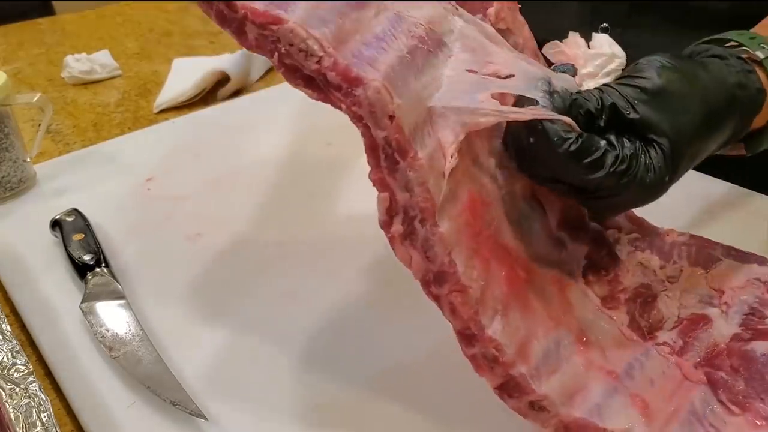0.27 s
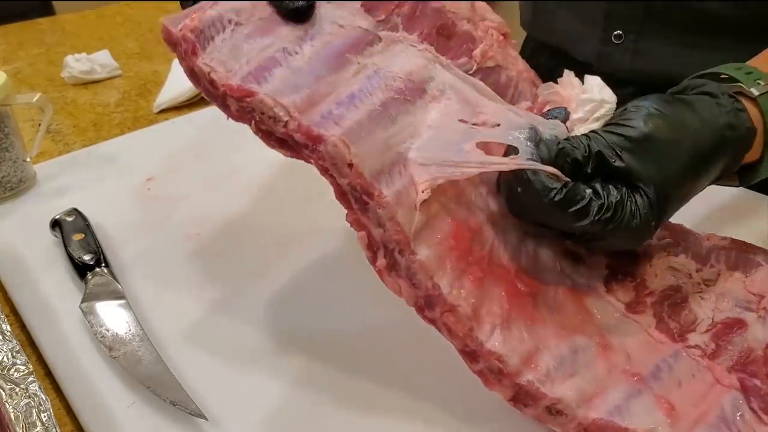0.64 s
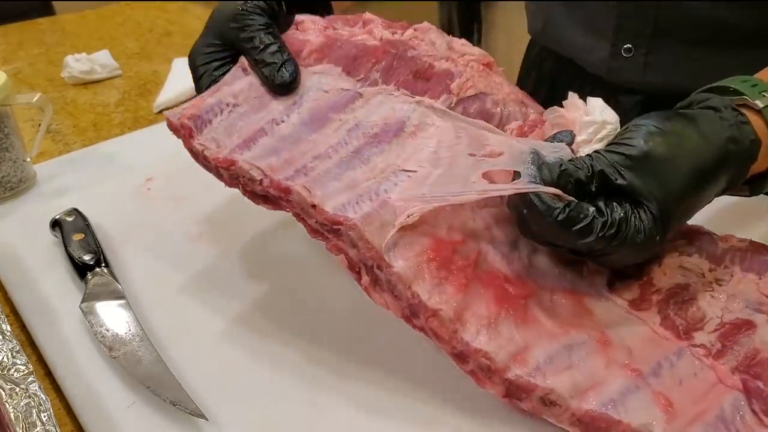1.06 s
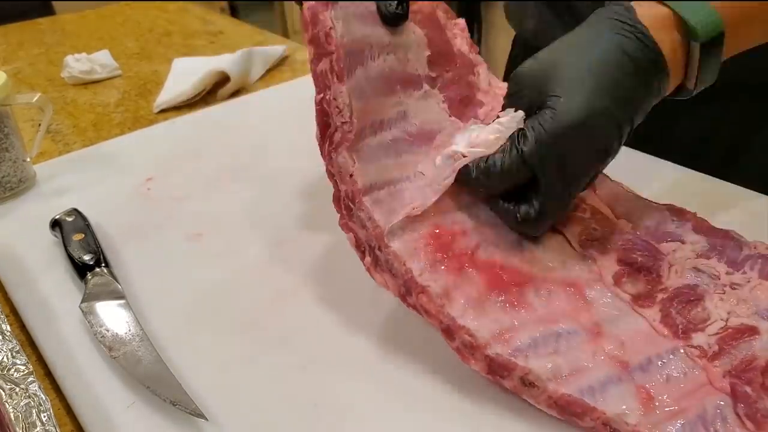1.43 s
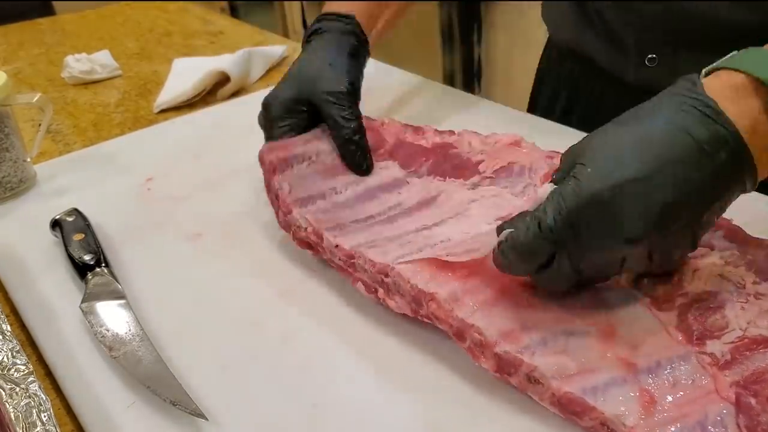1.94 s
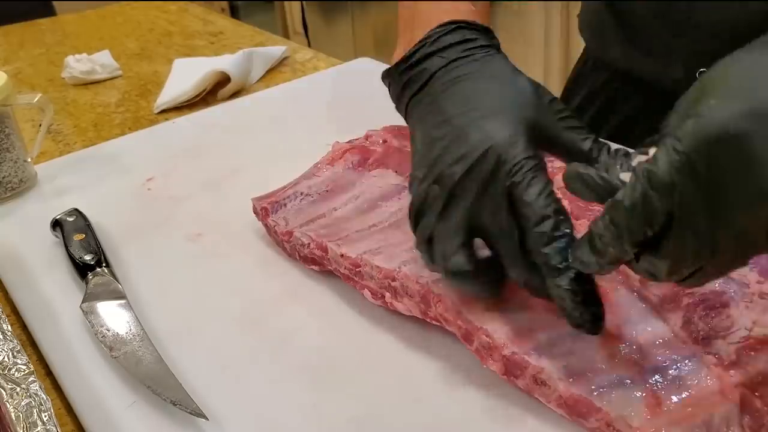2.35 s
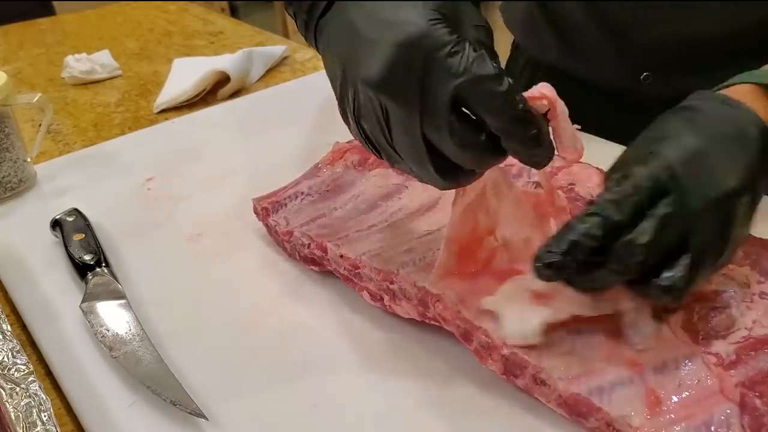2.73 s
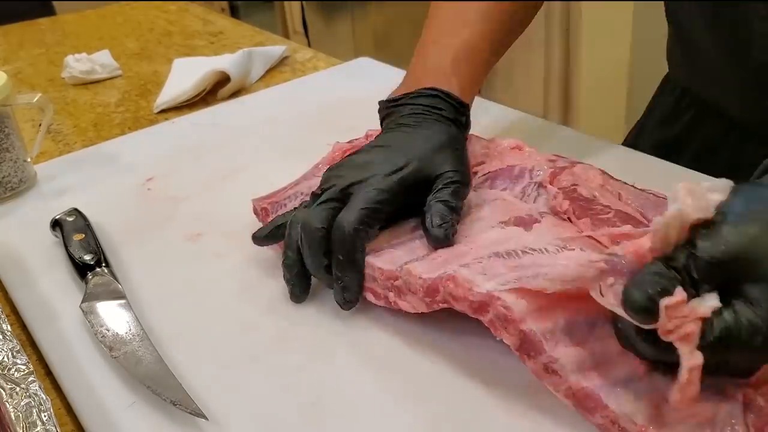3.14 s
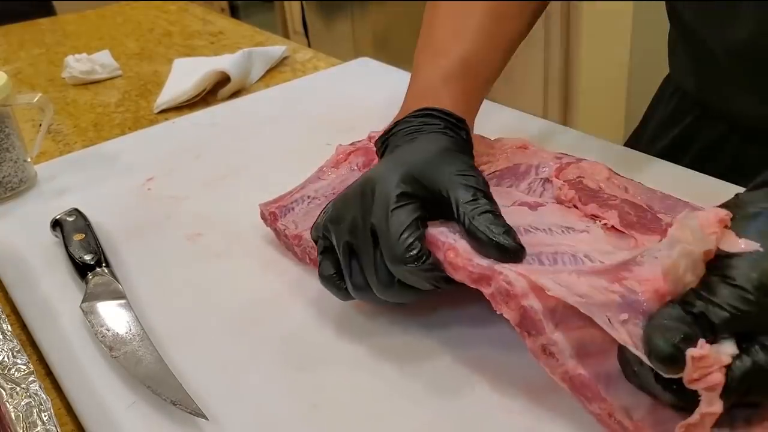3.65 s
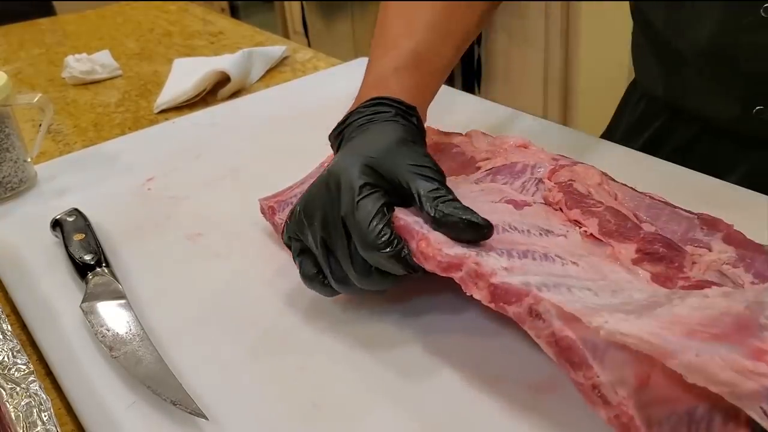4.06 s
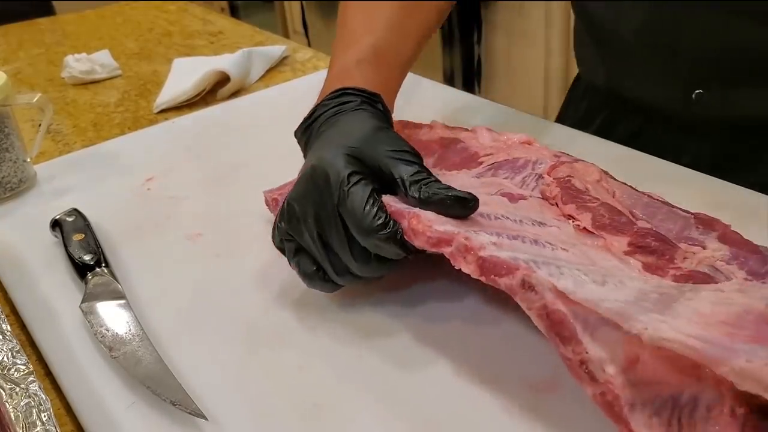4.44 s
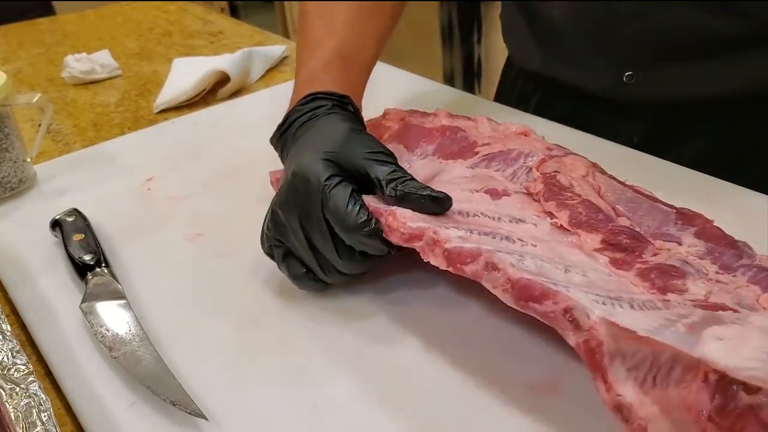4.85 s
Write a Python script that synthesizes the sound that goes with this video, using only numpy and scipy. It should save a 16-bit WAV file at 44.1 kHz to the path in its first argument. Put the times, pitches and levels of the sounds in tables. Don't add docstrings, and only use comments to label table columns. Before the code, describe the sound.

Close wet-sticky tearing and snapping from a rack of meat in a kitchen, rubbery squeaks, brief cut-off pulls, and a steady low hum beneath.

```python
import sys
import numpy as np
from scipy import signal
from scipy.fft import rfft, irfft, next_fast_len
from scipy.io import wavfile
from scipy.ndimage import uniform_filter1d

SR = 44100
rng = np.random.default_rng(int(sys.argv[2]) if len(sys.argv) > 2 else 0)


def store_wav(level_fs):
    pcm = np.round(np.clip(np.atleast_2d(level_fs), -1, 1) * 32767)
    wavfile.write(sys.argv[1], SR, pcm.T.astype(np.int16))


def how_loud(loudness_db):
    steps = np.asarray(loudness_db, float) / 20
    return 10 ** steps


N = 224557
LEFT_RIGHT = np.array([[1], [-1]])


def rms_one(x):
    return x / np.sqrt(np.mean(x ** 2) + 1e-20)


def at_hz(points, hz):
    table_hz, values = np.transpose(points)
    return np.interp(np.log(hz), np.log(table_hz), values)


def at_time(points, t):
    return np.interp(t, *np.transpose(points))


def drift(rate_hz):
    r = np.exp(-2 * np.pi * rate_hz / SR)
    slow = signal.lfilter([1], [1, -2 * r, r * r], rng.standard_normal(N + SR))
    return rms_one(slow[SR:])


def resonance(x, hz, width_hz):
    r = np.exp(-np.pi * width_hz / SR)
    zeros = np.array([1, 0, -1]) * (1 - r * r) / 2
    poles = [1, -2 * r * np.cos(2 * np.pi * hz / SR), r * r]
    return signal.lfilter(zeros, poles, x + 1e-18)


# (frequency [Hz], correlation [-1 to 1])
PORT_LIKENESS = [(50, .999), (125, .96), (250, .93), (500, .9), (1000, .78), (2000, .55), (8000, .4),
                 (14000, .3)]
# (frequency [Hz], left over right [dB])
PORT_LEAN = [(60, 0.0), (180, 0.0), (550, 0.6), (1650, 0.8), (4970, 2.4), (9000, -0.5), (15000, 0.5)]


def stereo(mid, side, hz):
    alike = np.clip(at_hz(PORT_LIKENESS, hz), -1, 1)
    lean = how_loud(at_hz(PORT_LEAN, hz) / 2 * LEFT_RIGHT)
    common = np.sqrt((1 + alike) / 2) * mid
    unlike = np.sqrt((1 - alike) / 2) * side * LEFT_RIGHT
    return lean * (common + unlike)


def room_noise(spectrum):
    bins_hz = np.fft.rfftfreq(N, 1 / SR) + 1
    mid, side = rfft(rng.standard_normal((2, N))) * how_loud(at_hz(spectrum, bins_hz))
    return rms_one(irfft(stereo(mid, side, bins_hz), N))


# (time [s], share of crackle [0-1])
CRACKLE_SHARE = [
    (0, 0.3),
    (.55, 0.67),
    (.7, 0.45),
    (1.2, 0.4),
    (1.4, 0.3),
    (5.1, 0),
]


def fibres(per_s, size_db):
    born = rng.random(N) < per_s * how_loud(4.0 * drift(25)) / SR
    sizes = born * how_loud(size_db * np.minimum(rng.exponential(1, N), 2.5))
    breaks = rms_one(signal.lfilter([1], [1, -.85], sizes))
    share = np.clip(at_time(CRACKLE_SHARE, np.arange(N) / SR), 0, 1)
    return np.sqrt(1 - share + share * breaks ** 2) * how_loud(1.23 * drift(44))


# (peak time [s], peak level [dB], rise [s], fall [s], weight on the board [dB])
SWELLING_PULLS = [(0.064, -49, .12, 0.25, -24), (0.205, -42, .3, .085, -19.5), (0.3, -58, .05, 0.22, -11.5),
                  (0.5, -57, .12, 0.14, -20), (0.608, -48.5, 0.27, 0.39, -31),
                  (0.706, -41.5, 0.22, 0.18, -18.5), (0.99, -62, 0.19, 0.38, -21),
                  (1.146, -59, 0.52, .08, -20), (1.49, -70.5, 0.14, 0.22, -10),
                  (1.866, -45, 0.077, 0.086, -24), (2.388, -56.5, 0.063, 0.043, -13.5),
                  (2.61, -71, 0.07, 0.11, -8), (2.804, -64.5, 0.062, 0.34, -10.5),
                  (3.275, -61.5, 0.024, 0.065, -13), (3.565, -58.5, 0.062, 0.17, -15),
                  (3.765, -34, .06, .1, -5.5), (3.96, -62.5, .3, 0.33, -10.5),
                  (4.052, -59.5, 0.089, 0.15, -5.5), (4.225, -71, .015, .08, -12),
                  (4.258, -67, 0.08, .1, -6.5), (4.37, -71, 0.2, 0.11, -17),
                  (4.485, -34, 0.064, 0.11, -6.5), (4.6, -60, .1, .2, -14), (4.95, -35, .075, .14, -9)]
# (start time [s], end time [s], start level [dB], end level [dB], weight on the board [dB])
CUT_PULLS = [(1.19, 1.317, -76, -79, -10), (1.31, 1.398, -70, -88, -8), (1.582, 1.737, -48.5, -54.5, -20),
             (1.742, 1.8, -66, -79, -9), (1.9, 1.99, -62, -74, -25), (2.04, 2.146, -56, -61, -10.5),
             (2.146, 2.197, -74, -66.5, -11), (2.199, 2.32, -51, -52, -16), (3.034, 3.102, -63, -54, -10.5),
             (3.105, 3.193, -49, -52, -1.5), (3.198, 3.232, -63, -81, -8), (3.338, 3.388, -71.5, -55, -17),
             (3.506, 3.713, -62, -64, -7), (4.845, 4.91, -60, -70, -9)]
# (time [s], level [dB])
SKIN_DRYNESS = [(0, 2.5), (1.1, 6), (1.55, 1), (1.95, 3.5), (2.08, 8), (2.19, 0), (2.75, 1), (3.27, 4),
                (3.36, -3), (3.47, -21), (3.51, 9.5), (3.6, 8.5), (3.8, -1), (4.3, 6.5), (4.5, -0.5),
                (4.7, -12), (4.85, 3.5), (5.09, -4.5)]
# (time [s], level [dB])
SKIN_SLACK = [(0, -2), (0.2, 2), (0.35, -5), (0.58, -5), (0.72, 0.5), (1.15, 1.5), (1.6, 1.5), (1.88, 1.5),
              (1.95, -14), (2.05, 0.5), (3.1, 1.5), (3.5, -5), (3.66, 2.5), (3.78, -1.5), (4.05, 1.5),
              (4.3, -4), (4.5, -1), (5.09, -1.5)]
SWELL_DB, SPLICE_S = 20, .003
CREST = .04
THUD_STEEP, BODY_STEEP, FIZZ_STEEP = 1.057, 1.26, 0.99


def effort():
    t = np.arange(0, N, 44) / SR
    pulls = []
    for peak_s, peak_db, rise_s, fall_s, weight_db in SWELLING_PULLS:
        away = np.maximum((peak_s - t) / rise_s, (t - peak_s) / fall_s)
        shape_db = -SWELL_DB * (np.hypot(away, CREST) - CREST)
        pulls.append((peak_db, shape_db, weight_db))
    for start, end, start_db, end_db, weight_db in CUT_PULLS:
        outside_s = np.maximum(np.maximum(start - t, t - end), 0)
        level_db = np.interp(t, [start, end], [start_db, end_db])
        pulls.append((level_db, -SWELL_DB * outside_s / SPLICE_S, weight_db))
    dry_db, slack_db = at_time(SKIN_DRYNESS, t), at_time(SKIN_SLACK, t)
    power = 0
    for top_db, shape_db, weight_db in pulls:
        thud_db = weight_db + .35 * slack_db + THUD_STEEP * shape_db
        body_db = -1.5 + 0.29 * weight_db + slack_db + BODY_STEEP * shape_db
        fizz_db = dry_db + FIZZ_STEEP * shape_db
        power = power + how_loud(top_db + np.array([thud_db, body_db, shape_db, fizz_db])) ** 2
    return [np.interp(np.arange(N) / SR, t, np.sqrt(p)) for p in power]


REGION_BORDERS = [1450, 2800, 6500]
# (frequency [Hz], density [dB per Hz])
TEAR_COLOUR = [(120, -17), (200, -5.5), (310, -12.5), (516, -6.5), (716, -10.5), (799, -1.5), (977, -9.5),
               (1360, -3), (1630, -7), (1920, -3), (7800, -9.5), (15600, -5.5)]
# (frequency [Hz], width [Hz], level [dB])
BOARD_MODES = [
    (522, 35, -3),
    (1380, 200, -14),
]
# (time [s], left port late by [samples])
HAND_LAG = [
    (0, 0.5),
    (1.3, 2),
    (1.4, 0.5),
    (5.1, 5),
]


def tearing():
    force = fibres(per_s=900.0, size_db=3.5) * rng.standard_normal((2, 2, N))
    regions = np.zeros((4, 2, N))
    edges_hz = 166 * 2 ** np.arange(0, 6.9, 1 / 3)
    wander = how_loud(1.6 * drift(14))
    for k, (low, high) in enumerate(zip(edges_hz, edges_hz[1:])):
        hz = np.sqrt(low * high)
        band = signal.butter(2, [low, high], "band", fs=SR, output="sos")
        mid, side = signal.sosfilt(band, force[k % 2])
        colour = how_loud(at_hz(TEAR_COLOUR, hz)) * np.roll(wander, 9973 * k)
        regions[np.searchsorted(REGION_BORDERS, hz)] += colour * stereo(mid, side, hz)
    for hz, width_hz, level_db in BOARD_MODES:
        ringing = resonance(force[0], hz, width_hz)
        regions[np.searchsorted(REGION_BORDERS, hz)] += how_loud(level_db + 0.5) * stereo(*ringing, hz)
    left, right = sum(gain * rms_one(region) for gain, region in zip(effort(), regions))
    sample = np.arange(N)
    lag = at_time(HAND_LAG, sample / SR).round()
    return np.array([np.interp(sample - lag, sample, left), right])


# (time [s], length [s], frequency [Hz], width [Hz], level [dB])
SKIN_SQUEAKS = [(0.1, .46, 601, 25, -76), (0.0, .3, 244.5, 12, -64), (0.549, 0.12, 2950, 400, -55),
                (0.78, .43, 1980, 790, -63), (1.01, .025, 4530, 200, -64), (2.042, .1, 5200, 1500, -55.5),
                (2.042, 0.09, 1920, 520, -62.5), (3.085, .11, 1950, 300, -56),
                (3.267, 0.077, 1450, 45, -70.5), (3.59, .12, 1760, 500, -61), (3.66, .18, 1690, 700, -48.5),
                (3.731, .12, 525, 26, -52.5), (4.037, 0.088, 1610, 700, -67),
                (4.221, 0.064, 1300, 700, -74), (4.448, 0.11, 529, 25, -52.5),
                (4.451, 0.071, 1350, 240, -46.5), (4.84, .05, 3130, 600, -58),
                (4.92, 0.063, 832, 160, -50.5), (4.89, .14, 3300, 1500, -47), (4.43, .12, 3100, 900, -50),
                (0.617, .15, 9000, 2000, -50), (0.618, 0.17, 2090, 810, -52),
                (2.79, 0.098, 4200, 2500, -66)]


def squeaks():
    out, t = np.zeros((2, N)), np.arange(N) / SR
    stutter = how_loud(2.5 * drift(80))
    white = stutter * rng.standard_normal((2, N))
    for s, length, hz, width_hz, level_db in SKIN_SQUEAKS:
        span = slice(max(round(s * SR) - 4000, 0), round((s + length) * SR))
        to_edge_s = np.minimum(t[span] - s, s + length - t[span])
        gate = np.clip(to_edge_s / (0.18 * length), 0, 1)
        ringing = resonance(white[:, span], hz, width_hz)
        ringing = rms_one(resonance(ringing, hz, width_hz))
        out[:, span] += how_loud(level_db) * gate * stereo(*ringing, hz)
    return out


# (start time [s], frequency [Hz], skipped at the start [turns])
HUM_STRETCHES = [
    (0, 53.1, 0),
    (1.317, 51.75, .5),
    (2.32, 51.75, -.25),
    (3.568, 53.1, -.5),
]
# (frequency [Hz], density [dB per Hz])
RUMBLE_COLOUR = [(20, -27), (31, -6.5), (41, -17), (70, -5), (85, -1), (110, -10.5), (135, -13.5),
                 (157, -8.5), (180, -15), (197, -13), (250, -22.5), (400, -34.5), (1000, -50.5),
                 (16000, -54.5)]
# (frequency [Hz], density [dB per Hz])
HISS_COLOUR = [(300, -8), (1000, -2), (2000, -20), (4200, -2), (6500, -0.5), (7500, -7), (9700, 5.5),
               (16000, -6)]


def compressor():
    start, hz, skipped = np.transpose(HUM_STRETCHES)
    turns = hz[np.searchsorted(start[1:], np.arange(N) / SR)] / SR
    turns[(start * SR).astype(int)] += skipped
    phase = 2 * np.pi * np.cumsum(uniform_filter1d(turns, size=480))
    hum = how_loud(-47) * np.sqrt(2) * np.sin(phase)
    rumble = how_loud(-52.0) * room_noise(RUMBLE_COLOUR)
    hiss = how_loud(-74 + 0.8 * drift(6)) * room_noise(HISS_COLOUR)
    return hum + rumble + hiss


# (time [s], peak level [dB], ring [Hz], top end over ring [dB])
LOUD_SNAPS = [(0.0198, -31, 6550, 3), (0.062, -29, 5170, -2), (0.0685, -21, 4740, 4),
              (0.094, -23, 6680, 4), (0.1187, -27, 4650, -2), (0.1693, -25, 5040, -1),
              (0.215, -25, 4440, -4), (0.2995, -26, 4870, 0), (0.3529, -25, 4910, -5),
              (0.401, -37, 4130, -2), (0.438, -35, 5300, 6), (0.4707, -29, 6760, -3),
              (0.5493, -23, 4390, 3), (0.5649, -31, 3010, -1), (0.5822, -30, 2540, 3),
              (0.6944, -24, 7060, -1), (0.7621, -28, 3960, -4), (0.8035, -31, 4010, 4),
              (1.0375, -25, 2760, 9), (1.3173, -43, 3140, -6), (1.8539, -26, 5470, 3),
              (2.2025, -33, 4780, -10), (2.3142, -37, 4820, -12), (2.3751, -37, 4130, 6),
              (3.1021, -33, 6850, 6), (3.3872, -45, 4740, -15), (3.6347, -41, 3570, 1),
              (3.9744, -38, 6590, -1), (4.0407, -38, 2020, 12), (4.8479, -38, 3270, -6)]
# (time [s], peak level
# [dB])
FAINT_SNAPS = [(0.2822, -45), (0.331, -36), (0.36, -38), (0.3813, -37), (0.3856, -42), (0.452, -35.5),
               (0.5223, -36), (0.8237, -40), (0.8924, -35.5), (0.9929, -42), (1.0134, -42), (1.09, -37.5),
               (1.264, -49), (1.803, -46), (1.921, -39), (1.965, -43), (1.9713, -39.5), (3.2644, -45),
               (3.977, -48), (4.1029, -45), (4.3867, -52)]


def snaps():
    out, age = np.zeros((2, N + 300)), np.arange(300) / SR
    ticks = []
    for s, peak_db in FAINT_SNAPS:
        hz = 5200 * np.exp(0.14 * np.clip(rng.normal(), -2, 2))
        ticks.append((s, peak_db, hz, 4.5 + at_time(SKIN_DRYNESS, s)))
    for s, peak_db, hz, top_db in LOUD_SNAPS + ticks:
        pan_db = rng.normal(2.8, 0.5)
        ring = np.sin(2 * np.pi * hz * age) * np.exp(-age / .00035)
        crack = np.sin(2 * np.pi * 11500 * age) * np.exp(-age / .0001)
        pop = ring + 2.6 * how_loud(top_db) * crack
        grit = np.diff(rng.standard_normal((2, 300)), prepend=0) * np.exp(-age / .0015)
        pop = pop / np.abs(pop).max() + .08 * grit
        at = round(s * SR) - 2
        out[:, at:at + 300] += pop * how_loud(peak_db + 5 + pan_db / 2 * LEFT_RIGHT)
    no_bass = signal.butter(3, 2000, "high", fs=SR, output="sos")
    return signal.sosfilt(no_bass, out[:, :N] + 1e-18)


def kitchen(x):
    size = next_fast_len(N + SR)
    w = 2 * np.pi * np.fft.rfftfreq(size)
    out = np.zeros((2, len(w)), complex)
    for k, lag in enumerate(rng.uniform(0.017, 0.042, 12) * SR):
        loss = how_loud(-60 * lag / SR / 0.25) / (1 + w * 0.77)
        loop = loss * np.exp(-1j * w * lag)
        out[k % 2] += loop / (1 - loop) * (-1) ** (k // 2)
    return irfft(out * rfft(x, size), size)[:, :N]


# (time [s], step level [dB])
HUM_SKIPS = [(1.3168, -38.5), (1.412, -55), (1.4245, -46.5), (1.435, -52), (1.4736, -55), (1.7304, -44),
             (1.7372, -45), (1.7751, -51), (2.0413, -45), (2.1766, -58), (2.195, -45), (2.3186, -43),
             (2.321, -47), (2.4133, -47.5), (2.4248, -49.5), (2.437, -52), (2.5351, -52.5), (2.5806, -44.5),
             (2.6904, -50), (2.728, -47), (2.7387, -44), (2.894, -48.5), (3.0243, -53), (3.038, -48),
             (3.2172, -51), (3.3317, -56), (3.341, -45), (3.3546, -46), (3.499, -48), (3.571, -44)]


def skips():
    steps = np.zeros(N)
    for s, step_db in HUM_SKIPS:
        steps[round(s * SR)] = how_loud(step_db + 1.0) * rng.choice([-1, 1])
    return signal.lfilter([1], [1, -np.exp(-2 * np.pi * 180.0 / SR)], steps + 1e-18)


def scene():
    cracks = snaps()
    echo = how_loud(-11) * kitchen(cracks.mean(axis=0))
    return tearing() + squeaks() + compressor() + cracks + echo + skips()


def top_cut(x):
    return signal.sosfilt(signal.butter(12, 16810, fs=SR, output="sos"), x)


def record(dry):
    low_pass = signal.ellip(12, .5, 60, 15740, fs=SR, output="sos")
    mix = signal.sosfilt(low_pass, dry)
    return top_cut(mix)


dry = scene()
out = record(dry)
store_wav(out)
```